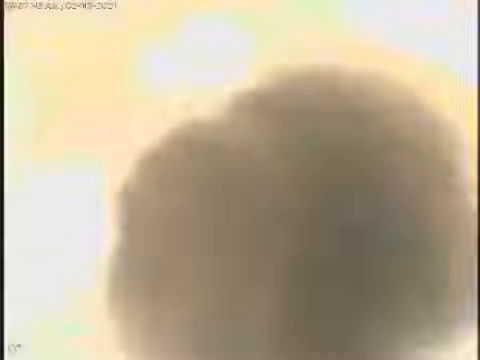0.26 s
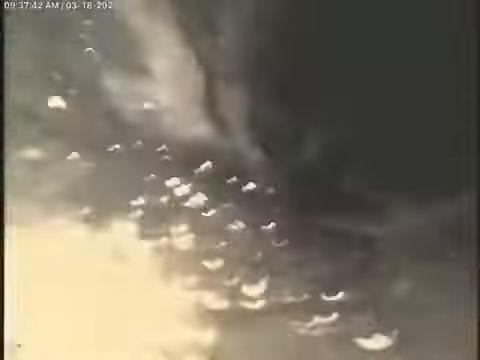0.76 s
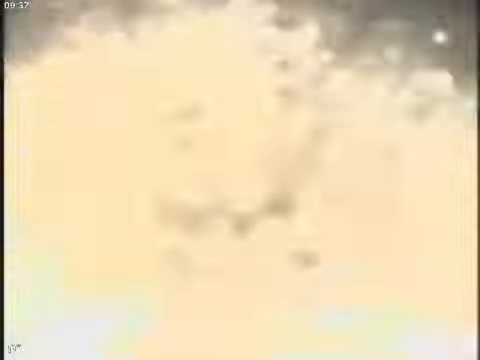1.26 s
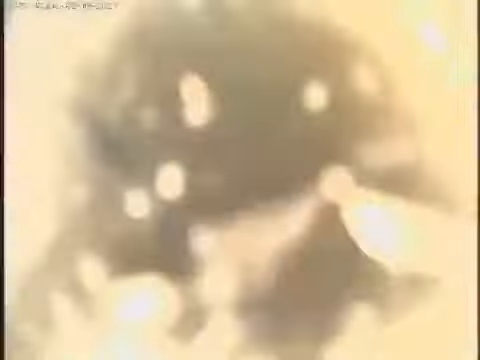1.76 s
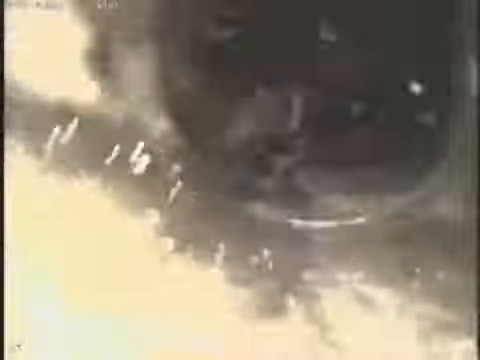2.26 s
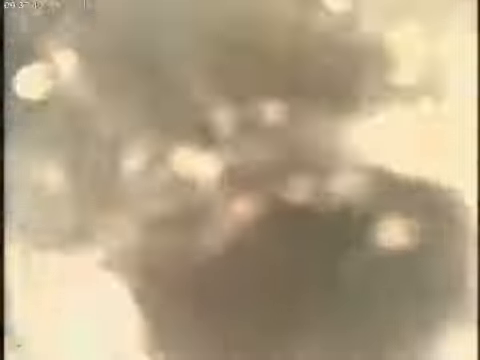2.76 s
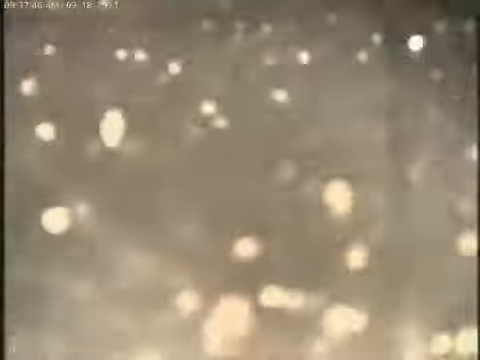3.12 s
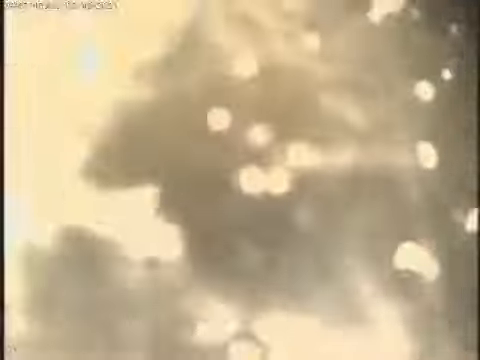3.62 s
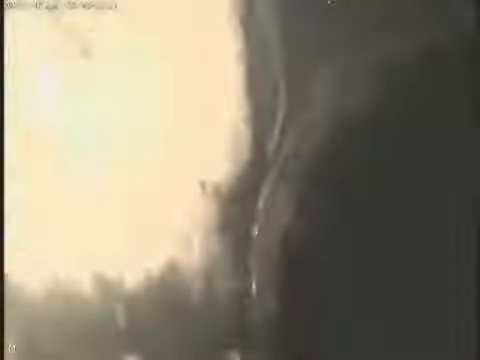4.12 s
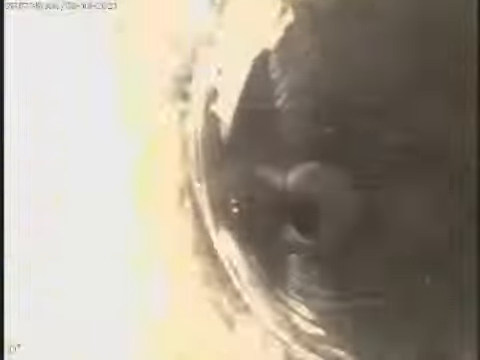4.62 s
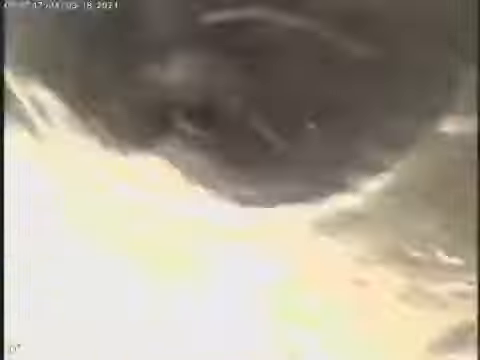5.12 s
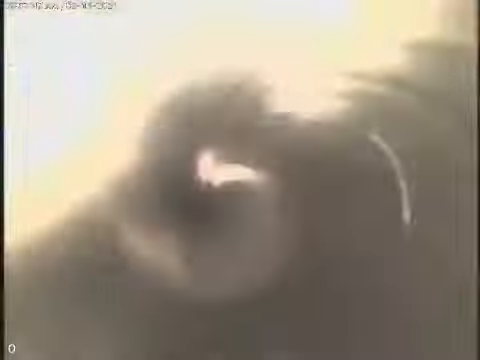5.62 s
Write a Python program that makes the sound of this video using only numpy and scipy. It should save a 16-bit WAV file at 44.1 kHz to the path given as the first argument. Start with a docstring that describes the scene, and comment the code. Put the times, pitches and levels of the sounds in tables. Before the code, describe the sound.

A stiff cable is shoved into a pipe in short scraping pushes, with reel thumps, knocks and one sharp metallic snap.

```python
"""Feeding a sewer camera cable

A stiff push cable is shoved by hand into a pipe, outdoors. Friction makes it rasp over the rim,
hiss through the hand and set its reel thrumming; now and then it knocks on the frame, snaps
against the steel cage or squeaks. Rumble and faint machine hum lie below; the top is cut near 7 kHz."""
import sys
import numpy as np
from scipy import signal
from scipy.fft import rfft, irfft
from scipy.io import wavfile
from scipy.ndimage import uniform_filter1d

SR = 44100
rng = np.random.default_rng(int(sys.argv[2]) if len(sys.argv) > 2 else 0)


def inscribe(sig):
    """Save sig as 16-bit PCM at rate SR to the path in sys.argv[1].

    A 1-D sig is mono; a 2-D sig holds one channel per row.
    Samples are clipped to [-1, 1] before scaling.
    """
    pcm = np.round(np.clip(np.atleast_2d(sig).T, -1, 1) * 32767)
    wavfile.write(sys.argv[1], SR, pcm.astype(np.int16))


N = 259308

# mode tables: (frequency [Hz], relative level [dB], t60 [s])
REEL_MODES = [(203.8, 1.5, 0.059), (239.8, -4.5, 0.1), (280.5, -4, 0.065), (342, -12, 0.021)]  # reel, lowest first
FRAME_MODES = [(583, -3.5, 0.018), (710.6, -4.5, 0.04), (890, -9, 0.013), (1134, -4, 0.02),
               (1237, -5.5, 0.015), (1553, -12, 0.021)]  # frame panels
GUIDE_MODES = [(2390, -4, 0.0032), (2770, 0.5, 0.0095), (3240, -5, 0.0079), (3643, -2, 0.016),
               (3996, -2, 0.015)]  # cable and its guide
TOP_MODES = [(4580, -3, 0.022), (5100, -5.5, 0.008), (5634, -4.5, 0.011), (6270, -5.5, 0.012),
             (6670, -9, 0.024)]  # highest modes: hard contacts, fast rubbing
ARM_MODES = [(1654, -0.5, 0.038), (2880, -11, 0.067), (4024, 2, 0.014)]  # steel guide arm
CAGE_MODES = [(2038, 2, 0.15), (2240, -10.5, 0.25), (3396, 0, 0.071), (3740, -10, 0.38), (4235, 1.5, 0.1),
              (4340, 1, 0.14), (5780, -5, 0.099)]  # steel reel cage, long ring


def sliding_cable():
    """Friction drives reel, frame, guide, cage and arm; some rubbing noise radiates directly."""
    thrum_gain, grind_gain, rasp_gain, hiss_gain = hand_feed()
    bumps = friction(slips_per_s=200, spread_db=3, smooth_db=-4)
    grit = friction(slips_per_s=600, spread_db=7, smooth_db=2.5)
    rubbing = from_db(-11) * rng.standard_normal(N)
    # only a firm push moves the whole reel in its lowest mode
    firmness = (thrum_gain / thrum_gain.max()) ** 0.42
    reel = resonate(bumps * firmness, REEL_MODES[:1]) - resonate(bumps, REEL_MODES[1:])
    thrum = steadied(band(reel, 165, 490, order=2), span_s=0.095)
    # hard grinding rings the pipe mouth at about 700 Hz
    hollow = from_db(3) * resonate(grit * grind_gain / grind_gain.max(), FRAME_MODES[1:2])
    frame = resonate(grit, FRAME_MODES) - hollow  # minus: in phase with that mode
    grind = steadied(band(frame + rubbing, 330, 1750), span_s=0.072)
    guide_and_cage = resonate(grit, GUIDE_MODES) + from_db(-0.5) * resonate(grit, CAGE_MODES)
    arm = from_db(-4.5) * rms_one(resonate(grit, ARM_MODES))
    rasp = rms_one(band(guide_and_cage + rubbing, 1950, 4260)) + arm
    hiss = rms_one(band(resonate(grit, TOP_MODES) + rubbing, 3800, 7600))
    return (from_db(-2.5) * thrum_gain * thrum + from_db(-5.5) * grind_gain * grind
            + from_db(-0.5) * rasp_gain * rasp + from_db(-3) * hiss_gain * hiss)


def hand_feed():
    """Cable speed in each shove sets the gains of thrum, grind, rasp and hiss."""
    # shoves: (start [s], speed-up [s], hold [s], slow-down [s], relative thrum, grind, rasp, hiss [dB])
    shoves = [(0.01, 0.22, 0.017, 0.03, -34, -37.5, -49, -54),
              (0.26, 0.061, 0.368, .05, -32, -41, -51.5, -53),
              (0.87, 0.07, 0.033, 0.58, -45.5, -47.5, -52, -54.5),
              (1.291, .09, 0.012, 0.068, -51.5, -53, -54, -56),
              (1.481, 0.24, 0.03, .19, -41.5, -44, -47.5, -51),
              (2.0, 0.016, 0.1, 0.39, -44, -47, -54.5, -57),
              (2.405, 0.052, 0.36, 0.099, -50.5, -52.5, -52.5, -44.5),
              (2.86, 0.055, 0.16, 0.11, -36, -44, -55, -55.5),
              (3.149, 0.34, .24, .16, -21, -35.5, -44.5, -45.5),
              (3.759, 0.12, 0.039, 0.059, -43, -41, -44.5, -47),
              (3.95, 0.17, .1, .09, -57, -46, -46.5, -47),
              (4.31, 0.14, 0.035, 0.056, -66.5, -50.5, -49, -53.5),
              (4.48, 0.052, .12, 0.09, -75, -79, -59, -55),
              (4.79, 0.048, 0.0059, 0.0089, -64, -71, -54, -54),
              (4.91, 0.15, 0.031, 0.15, -47, -44.5, -45, -47),
              (5.301, 0.067, 0.24, 0.046, -51, -34, -39, -42),
              (5.629, 0.028, 0.016, 0.067, -57, -44, -38, -40),
              (5.76, 0.063, .04, 0.13, -60, -48.5, -48.5, -53.5)]
    # gain ~ speed ** exponent: (thrum, grind, rasp, hiss [-])
    speed_exponents = (0.74, 0.51, 0.89, 0.76)
    # floor from the creeping cable: (relative thrum, grind, rasp, hiss [dB])
    creep_db = (-57, -57.5, -76, -71)
    t = np.arange(N) / SR
    exponents = np.array(speed_exponents)[:, None]
    power = from_db(creep_db)[:, None] ** 2 * np.ones(N)
    for start_s, rise_s, hold_s, fall_s, *levels_db in shoves:
        corners_s = start_s + np.cumsum([0, rise_s, hold_s, fall_s])
        moving = (t > corners_s[0]) & (t < corners_s[-1])
        speed = np.interp(t[moving], corners_s, [0, 1, 1, 0])
        power[:, moving] += (from_db(levels_db)[:, None] * speed ** exponents) ** 2
    return np.sqrt(power)


def friction(slips_per_s, spread_db, smooth_db):
    """Tiny uneven slips, in clumps, over smooth rubbing."""
    sizes = from_db(spread_db * np.minimum(rng.exponential(1, N), 4))
    signs = rng.choice([-1, 1], N)
    slipping = rng.random(N) < slips_per_s * from_db(3 * drift(45)) / SR
    return rms_one(sizes * signs * slipping) + from_db(smooth_db) * rng.standard_normal(N)


def strikes():
    """Cable strikes ring reel, frame, guide and cage; lurches only thump, grit only ticks."""
    # cable hits frame and guide: (time [s], reel thump [dB], frame knock [dB], guide clack [dB])
    hits = [(0.025, -60, -52, -64), (0.1587, -55, -30.5, -45), (0.3397, -34, -52, -41.5),
            (0.3743, -50, -47.5, -40), (0.486, -23, -40, -48), (0.6059, -54, -41, -46),
            (0.7231, -36.5, -39, -42.5), (0.88, -47.5, -50, -40), (1.4747, -40.5, -39, -53),
            (2.193, -60, -48, -48.5), (2.4215, -41.5, -48.5, -51.5), (2.7905, -34, -41.5, -37.5),
            (2.972, -33, -37.5, -48), (3.0245, -60, -46.5, -40), (3.029, -26.5, -32, -43),
            (3.073, -30, -17.5, -32.5), (3.693, -42, -38, -41.5), (3.81, -45.5, -40, -47),
            (4.069, -41, -41, -41), (4.2215, -51.5, -43, -63), (4.254, -54, -43, -63),
            (5.021, -49, -45, -34), (5.1491, -45, -40, -28.5), (5.164, -31, -25.5, -38),
            (5.2824, -39.5, -25, -28.5), (5.3359, -38.5, -36, -61), (5.4154, -66.5, -35.5, -34.5),
            (5.7759, -56, -48.5, -37)]
    # reel lurches round: (time [s], level [dB])
    lurches = [(0.657, -27.5), (1.705, -42), (1.854, -38), (1.913, -35.5), (2.084, -34.5), (2.903, -34),
               (3.628, -18.5)]
    # grit cracks under the cable: (time [s], level [dB])
    grit_ticks = [(0.198, -46), (0.221, -50), (0.604, -46), (0.68, -48.5), (0.714, -47), (0.7223, -45.5),
                  (2.789, -42.5), (3.5, -45.5)]
    out = np.zeros(N)
    for time_s, thump_db, knock_db, clack_db in hits:
        add(out, time_s, from_db(thump_db) * reel_thump())
        knock = blow(FRAME_MODES, 392, 1440, rattle_db=-2.5, rattle_t60_s=0.092)
        add(out, time_s, from_db(knock_db) * knock)
        clack = blow(GUIDE_MODES, 1730, 4150, rattle_db=0, rattle_t60_s=0.089)
        add(out, time_s, from_db(clack_db) * clack)
        add(out, time_s, from_db(clack_db - 11) * tick())
        add(out, time_s, from_db(clack_db - 15) * cage_ring())
    for time_s, level_db in lurches:
        add(out, time_s, from_db(level_db) * reel_thump())
    for time_s, level_db in grit_ticks:
        add(out, time_s, from_db(level_db) * tick())
    return out


def steel_contacts():
    """Hard snaps on the cage wire, light pings on the guide arm."""
    # sprung cable hits the cage: (time [s], level [dB])
    snaps = [(4.0678, -19.5), (4.082, -35.5)]
    # cage wire: (frequency [Hz], relative level [dB], t60 [s])
    wire_modes = [(2340, -8, 0.038), (3280, -8, 0.028), (3670, 8, 0.0081), (4100, -17.5, .008),
                  (5550, -9.5, 0.0081), (6170, -9, 0.032)]
    # taps on the arm: (time [s], level [dB])
    pings = [(0.025, -48.5), (0.338, -39), (1.095, -48), (2.421, -50), (2.79, -46), (2.936, -41.5)]
    out = np.zeros(N)
    for time_s, level_db in snaps:
        snap = blow(wire_modes, 1840, 7500, rattle_db=-6.5, rattle_t60_s=0.098)
        add(out, time_s, from_db(level_db) * snap)
        add(out, time_s, from_db(level_db - 16) * cage_ring())
    for time_s, level_db in pings:
        add(out, time_s, from_db(level_db) * unit_onset(struck(ARM_MODES, scatter_db=2)))
    return out


def reel_thump():
    """A soft blow shakes the reel."""
    return blow(REEL_MODES, 185, 371, rattle_db=-3, rattle_t60_s=0.23)


def tick():
    """A hard contact rings the highest modes."""
    return blow(TOP_MODES, 4400, 6600, rattle_db=0, rattle_t60_s=0.071)


def cage_ring():
    """The steel cage rings on after a blow."""
    return unit_onset(struck(CAGE_MODES, scatter_db=2))


def blow(modes, low_hz, high_hz, rattle_db, rattle_t60_s):
    """Modes ring at once; loose coils rattle, partly through the same modes."""
    t = np.arange(SR // 3) / SR
    envelope = (1 - np.exp(-t / 0.00027)) * np.exp(-np.log(1000) * t / rattle_t60_s)
    direct, drive = rng.standard_normal((2, len(t))) * envelope
    coils = rms_one(resonate(drive, modes)) + rms_one(band(direct, low_hz, high_hz))
    rattle = band(coils, low_hz, high_hz, order=2)
    tone = band(struck(modes, scatter_db=1.2), low_hz, high_hz, order=2)
    return unit_onset(rms_one(tone) + from_db(rattle_db) * rms_one(rattle))


def struck(modes, scatter_db):
    """Free decay after one contact; random mode strengths stand for the contact point."""
    t = np.arange(SR // 3) / SR
    hz, level_db, t60_s = np.transpose(modes)[:, :, None]
    strength = from_db(level_db + scatter_db * rng.standard_normal(level_db.shape))
    decay = np.exp(-np.log(1000) * t / t60_s)
    return np.sum(strength * decay * np.sin(2 * np.pi * hz * t), axis=0)


def squeaks():
    """Stick-slip locks briefly onto one unsteady pitch."""
    # cable sticks: (centre time [s], length [s], pitch [Hz], level [dB])
    sticks = [(2.484, 0.018, 1235, -42.5), (4.996, 0.041, 1630, -41.5), (5.074, 0.026, 1650, -40),
              (5.129, 0.14, 1644, -47.5), (5.224, 0.15, 1660, -54.5), (5.815, 0.02, 2410, -41.5)]
    out = np.zeros(N)
    waver = 1 + 0.038 * drift(250)
    for centre_s, length_s, hz, level_db in sticks:
        size = int(length_s * SR)
        pitch_hz = hz * np.roll(waver, -int(centre_s * SR))[:size]
        tone = np.sqrt(2) * np.sin(2 * np.pi * np.cumsum(pitch_hz) / SR)
        add(out, centre_s - length_s / 2, from_db(level_db) * np.hanning(size) * tone)
    return out


def outdoor_rumble():
    """Steady noise, strongest in the bass."""
    # outdoor air spectrum: (frequency [Hz], relative density [dB])
    spectrum = [(20, -19), (40, -2), (70, 3), (120, -1), (200, -8), (300, -16.5), (450, -19.5), (900, -24),
                (2000, -29), (4000, -34), (7000, -48)]
    hz, density_db = np.transpose(spectrum)
    bins_hz = np.maximum(np.arange(N // 2 + 1) * SR / N, 1)
    shape = from_db(np.interp(np.log(bins_hz), np.log(hz), density_db))
    return from_db(-46) * rms_one(irfft(rfft(rng.standard_normal(N)) * shape, N))


def machine_hum():
    """Faint machine tones wavering together in pitch."""
    # hum tones: (frequency [Hz], level [dB])
    tones = [(64.6, -57.5), (129.2, -57.5), (150.7, -60.5), (279.9, -58.5)]
    clock_s = np.cumsum(1 + 0.004 * drift(2.96)) / SR
    return sum(np.sqrt(2) * from_db(level_db) * np.sin(2 * np.pi * (hz * clock_s + rng.random()))
               for hz, level_db in tones)


def resonate(x, modes):
    """Parallel resonators of alternating sign; t60 sets each width."""
    out = 0
    for k, (hz, level_db, t60_s) in enumerate(modes):
        radius = from_db(-60 / (t60_s * SR))
        b = np.array([1, 0, -1]) * (1 - radius ** 2) / 2
        a = [1, -2 * radius * np.cos(2 * np.pi * hz / SR), radius ** 2]
        out = out + (-1) ** k * from_db(level_db) * signal.lfilter(b, a, x + 1e-18)
    return out


def band(x, low_hz, high_hz, order=3):
    """Causal band-pass."""
    sos = signal.butter(order, [low_hz, high_hz], "band", fs=SR, output="sos")
    return signal.sosfilt(sos, x + 1e-18)


def drift(rate_hz):
    """Random wander at unit rms."""
    knots = rng.standard_normal(4096)
    return rms_one(np.interp(np.arange(N) / SR * rate_hz, np.arange(len(knots)), knots))


def steadied(x, span_s):
    """Unit running rms; only the quick texture remains."""
    return x / np.sqrt(uniform_filter1d(x ** 2, int(span_s * SR)) + 1e-12)


def unit_onset(x):
    """Unit rms over the first 20 ms."""
    return x / np.sqrt(np.mean(x[:SR // 50] ** 2))


def rms_one(x):
    """Unit rms."""
    return x / np.sqrt(np.mean(x ** 2) + 1e-20)


def from_db(db):
    """Decibels to gain."""
    return 10 ** (np.asarray(db) / 20)


def add(out, time_s, sound):
    """Mix a sound in at time_s."""
    start = int(time_s * SR)
    out[start:start + len(sound)] += sound[:N - start]


def scene():
    """Cable and background, mono."""
    cable = sliding_cable() + strikes() + steel_contacts() + squeaks()
    return (cable + outdoor_rumble() + machine_hum())[None]


def record(dry):
    """The inspection unit's narrow-band microphone cuts the top steeply."""
    cutoff_hz = 6950
    return signal.sosfilt(signal.ellip(10, 0.3, 70, cutoff_hz, fs=SR, output="sos"), dry)


dry = scene()
out = record(dry)
inscribe(out)
```